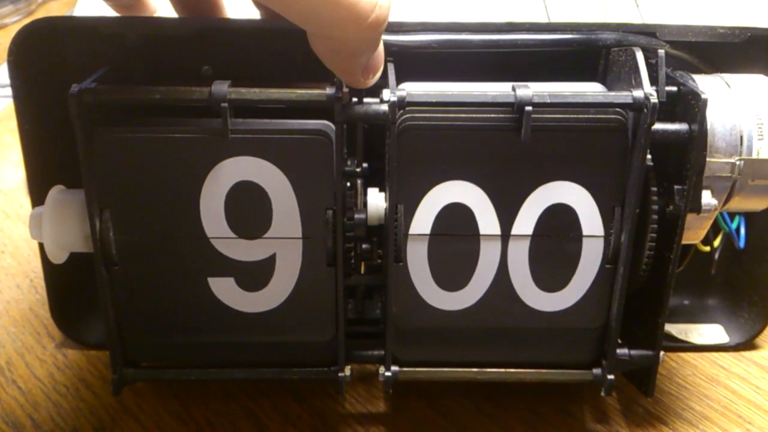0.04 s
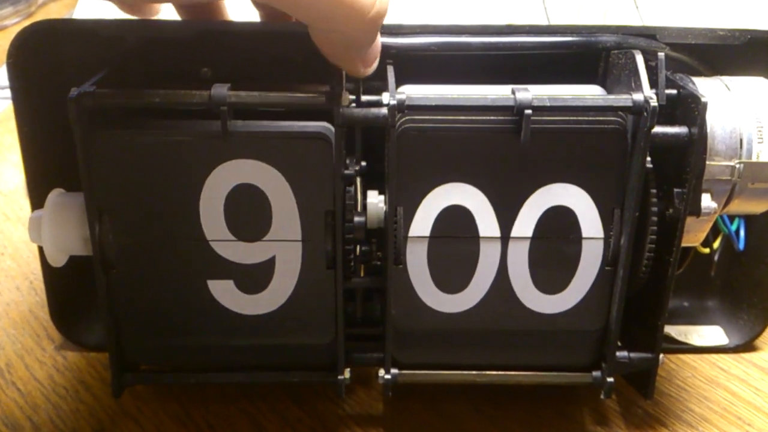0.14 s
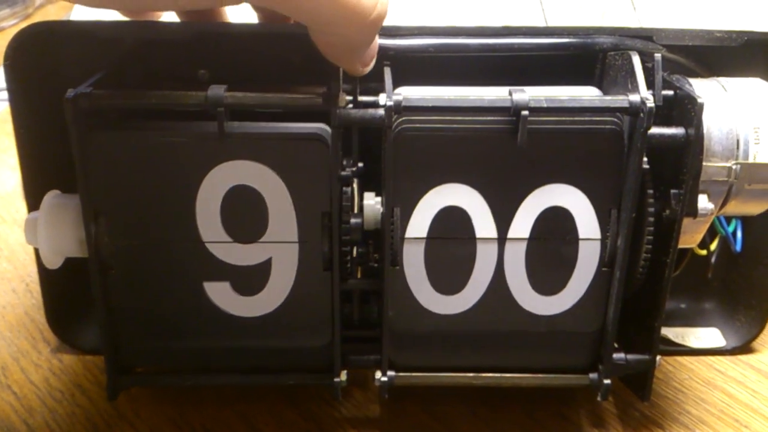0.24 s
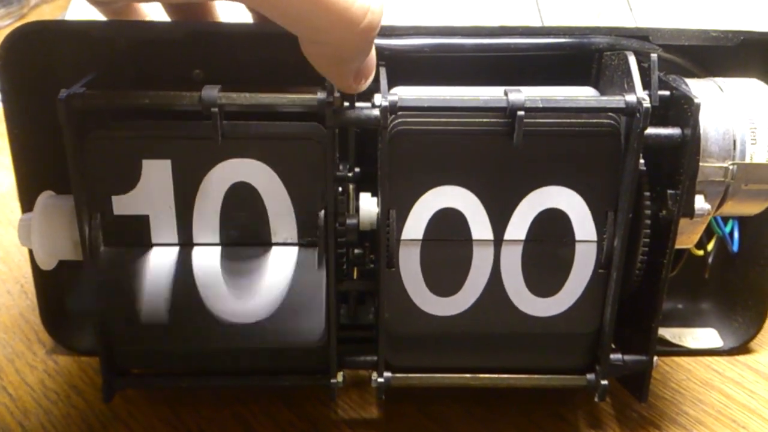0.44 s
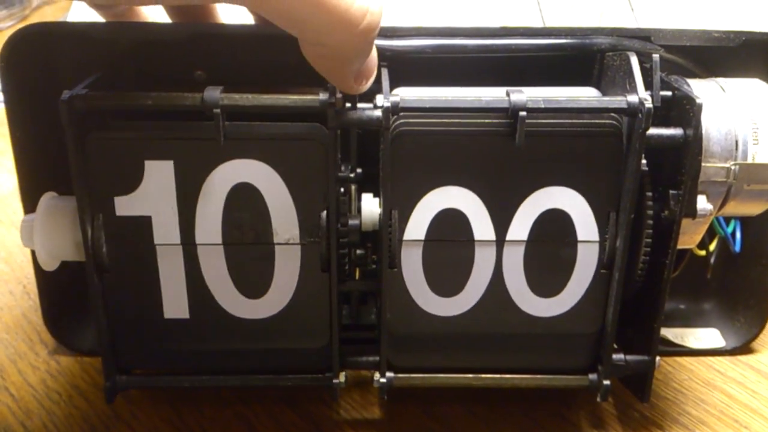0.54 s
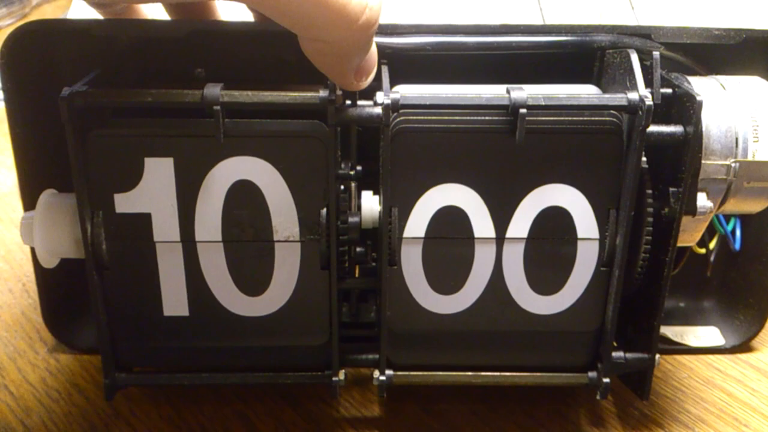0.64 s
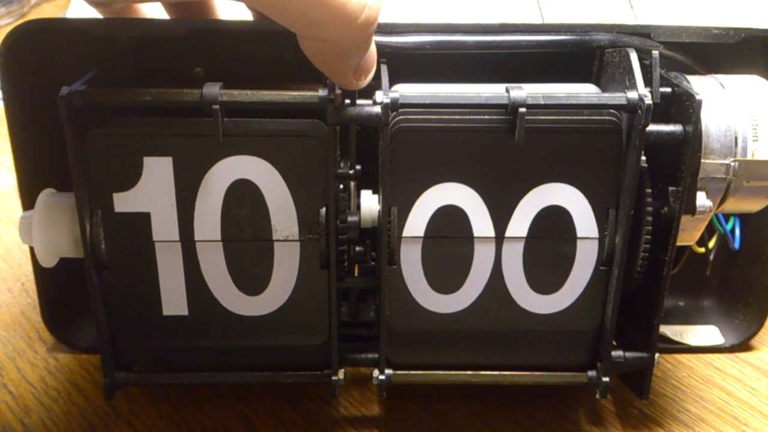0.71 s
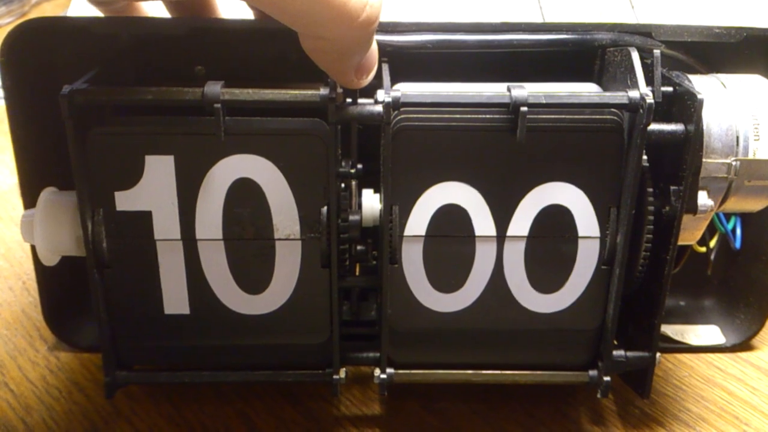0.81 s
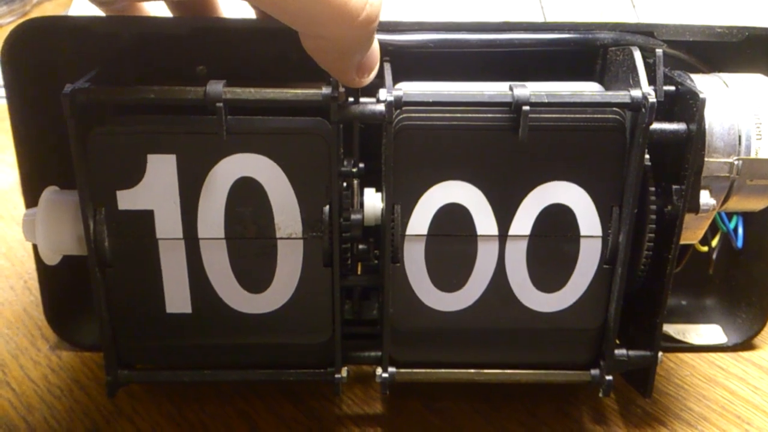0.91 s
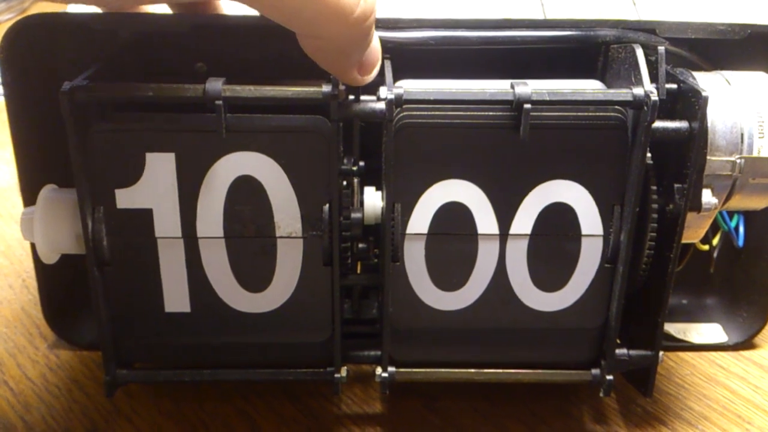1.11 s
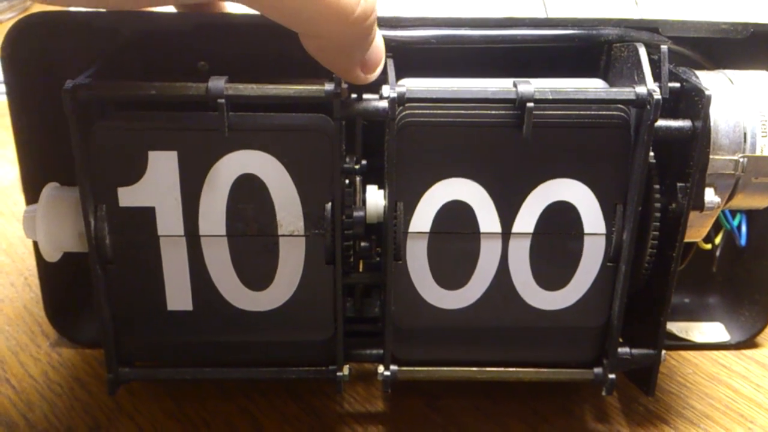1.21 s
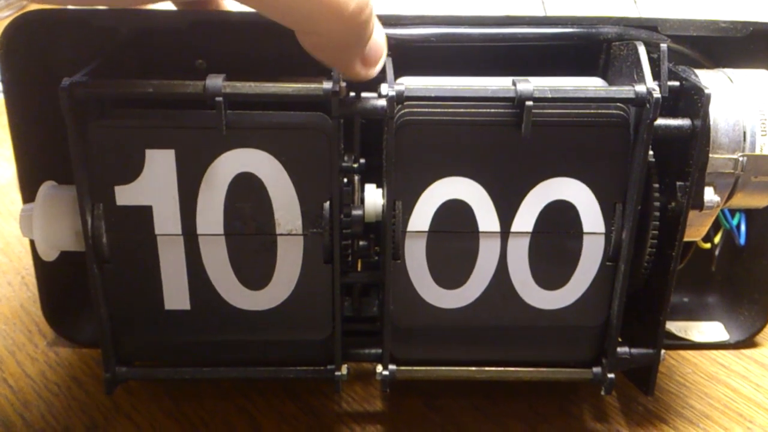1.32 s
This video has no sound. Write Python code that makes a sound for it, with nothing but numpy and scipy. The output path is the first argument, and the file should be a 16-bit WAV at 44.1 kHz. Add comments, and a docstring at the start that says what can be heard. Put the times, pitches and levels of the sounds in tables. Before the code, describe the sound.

A mechanical flip clock advances by hand with a crisp snap, flap clatter and closing click, close up

```python
"""A flip clock is turned by hand on a wooden desk, close to the microphone, over faint hum and air noise.
First a plastic pawl drags (many tiny random slips), snaps (ringing tones and a noise burst) and rebounds.
Then the hour flap slips free, slaps down and flutters: knocks of ringing tones and noise ticks.
Last, more sliding leads to a catch that clicks home, with one late flap knock.
A small room answers all the clock's sounds with a fading tail of noise."""
import sys
import numpy as np
from scipy import signal
from scipy.fft import rfft, irfft, next_fast_len
from scipy.io import wavfile
from scipy.ndimage import uniform_filter1d

SR = 44100
rng = np.random.default_rng(int(sys.argv[2]) if len(sys.argv) > 2 else 0)


def int16_out(signal):
    """Quantize to a 16-bit WAV file."""
    q = np.round(np.clip(np.atleast_2d(signal).T, -1, 1) * 32767)
    wavfile.write(sys.argv[1], SR, q.astype(np.int16))


N = 59535  # length of the scene [samples]

# In every table, t60 is the time a sound takes to fade by 60 dB.
SNAP_RISE_S = 0.0013


def amp(db):
    """Turns decibels into a gain."""
    return 10 ** (np.asarray(db) / 20)


def unit(x):
    """Scales a signal to an average (rms) level of 1."""
    return x / np.sqrt(np.mean(x ** 2) + 1e-20)


def read(points, hz):
    """Reads between the points of a table, with pitch on a log scale as we hear it."""
    table_hz, value = np.transpose(points)
    return np.interp(np.log(hz + 1), np.log(table_hz + 1), value)


def add(mix, start, sound):
    """Mixes a sound in at a start time [s], cutting off what runs past the end."""
    part = mix[round(start * SR):][:len(sound)]
    part += sound[:len(part)]


def colour(x, spectrum):
    """Makes each frequency of a signal louder or softer as a table says, then sets rms to 1."""
    size = next_fast_len(len(x))
    gain = amp(read(spectrum, np.fft.rfftfreq(size, 1 / SR)))
    return unit(irfft(rfft(x, size) * gain, size)[:len(x)])


def strike(t, rise, t60):
    """The loudness of a blow: a quick rise, then an exponential fade."""
    return (1 - np.exp(-(t / rise) ** 2)) * amp(-60 * t / t60)


def ring(modes, rise, pitch=1):
    """One blow sets off several pure tones, each fading at its own speed."""
    longest_t60 = max(t60 for _, _, t60 in modes)
    t = np.arange(0, 2 * longest_t60, 1 / SR)
    out = np.zeros(len(t))
    for k, (hz, db, t60) in enumerate(modes):
        sign = (-1) ** k  # every other tone starts downwards
        tone = np.sin(2 * np.pi * hz * pitch * t)
        out += sign * amp(db) * strike(t, rise, t60) * tone
    return out


def burst(spectrum, rise, t60, size=2048):
    """Short noise for the many crowded tones of a plastic part, which blur together."""
    noise = colour(rng.standard_normal(size), spectrum)
    return noise * strike(np.arange(size) / SR, rise, t60)


def background():
    """Ventilation is shaped noise; mains hum and fan tones are sines that waver slowly."""
    # colour of the ventilation noise: (frequency [Hz], relative level [dB])
    air = [(15, -60), (25, -43), (43, -22.5), (69, -20), (91, -7.5), (173, -5), (198, -9.5), (233, -0.5),
           (289, -7.5), (313, -11), (349, -7.5), (537, -16.5), (582, -13.5), (684, -14), (1050, -14.5),
           (2300, -23.5), (3260, -33), (9810, -38), (15500, -38.5)]
    # mains hum and fan tones: (frequency [Hz], rms level [dB])
    hum = [(100, -61), (140, -67.5), (167, -69), (237, -66.5), (349.5, -70), (435, -74), (580, -68)]
    air_db = -53.5  # rms level
    waver = 0.29  # rms wobble: share of the loudness, and radians of phase
    t = np.arange(N) / SR
    out = amp(air_db) * colour(rng.standard_normal(N), air)
    for hz, db in hum:
        # smoothing noise over 4000 samples leaves only slow drifts
        loudness_drift, phase_drift = (
            unit(uniform_filter1d(rng.standard_normal(N), size=4000, mode="wrap")) for _ in range(2))
        phase = 2 * np.pi * (hz * t + rng.random()) + waver * phase_drift
        out = out + amp(db) * unit((1 + waver * loudness_drift) * np.sin(phase))
    return out


def room(x):
    """Walls send back dense reflections: noise in which each band fades at its own speed."""
    # fading of the room: (frequency [Hz], t60 [s])
    decay = [(200, 0.9), (1500, .27), (4500, 0.26), (9000, 0.2), (15000, 0.14)]
    level_db, delay_s = -20.5, 0.0042
    hz, t, bands = signal.stft(rng.standard_normal(N // 2), SR, nperseg=256)
    fade = amp(-60 * t / read(decay, hz)[:, None])
    tail = signal.istft(bands * fade, SR, nperseg=256)[1]
    # silent for one delay, then fading in over another
    tail = tail * np.clip(np.arange(len(tail)) / SR / delay_s - 1, 0, 1)
    return amp(level_db) * signal.fftconvolve(x, tail / np.linalg.norm(tail))[:N]


def sliding():
    """Plastic drags on plastic: many tiny slips, swelling and fading with each stroke."""
    # strokes: (start [s], peak [s], end [s], peak rms level [dB], fall at both ends [dB],
    #           tilt [dB per octave])
    scrapes = [(0.141, 0.195, 0.22, -45, 14.5, -1.1), (0.345, 0.419, 0.5, -40.5, 17, -0.5),
               (0.532, 0.551, .561, -50, 4.5, -3.5)]
    # colour of the sliding, before the tilt: (frequency [Hz], relative level [dB])
    slide_colour = [(300, -14.5), (750, -1), (1200, -8.5), (1900, 3.5), (2350, 5.5), (3450, -4.5),
                    (4000, -2.5), (4900, -3.5), (6100, -13.5), (7800, -10.5), (9800, -4.5), (11500, -13),
                    (13000, -29), (16000, -40)]
    slips_per_s, spread_db = 1500, 3
    t = np.arange(N) / SR
    direction = rng.choice([-1, 1], N)
    happens = rng.random(N) < slips_per_s / SR
    strength = amp(spread_db * np.minimum(rng.exponential(1, N), 3))
    slips = direction * happens * strength
    out = np.zeros(N)
    for start, peak, end, db, fall_db, tilt_db in scrapes:
        swell = amp(np.interp(t, [start, peak, end], [db - fall_db, db, db - fall_db]))
        stroke = swell * (t > start) * (t < end)
        tilted = [(hz, level + tilt_db * np.log2(hz)) for hz, level in slide_colour]
        out = out + stroke * colour(slips, tilted)
    return out


def snap(start, levels_db, modes):
    """A sprung part slips off its tooth, hits its stop and shakes the loose flaps."""
    # colour of the crack: (frequency [Hz], relative level [dB])
    crack = [(200, -20), (700, -3), (1300, 0.5), (2000, 1), (3000, 3), (4500, 5.5), (5700, -5.5), (8000, 3),
             (11000, 5), (13000, -14), (14200, -17), (16000, -23)]
    # colour of the shaken loose flaps: (frequency [Hz], relative level [dB])
    rattle = [(300, -12), (1200, 7.5), (2300, 5.5), (3300, -3.5), (4700, 4.5), (5900, -9.5), (7800, -1),
              (9500, -4), (12300, -7), (14000, -20), (16000, -30)]
    ring_db, crack_db, rattle_db = levels_db
    out = np.zeros(N)
    add(out, start, amp(ring_db) * ring(modes, SNAP_RISE_S))
    add(out, start, amp(crack_db) * burst(crack, SNAP_RISE_S, t60=0.021))
    add(out, start, amp(rattle_db) * burst(rattle, rise=0.011, t60=0.29, size=12000))
    return out


def catch():
    """The catch clicks home: its blow rings, cracks and faintly shakes the flaps."""
    # what the catch rings with: (frequency [Hz], relative level [dB], t60 [s])
    catch_modes = [(645, -58, .05), (804, -57, 0.057), (980, -49, 0.034), (2215, -40, 0.043),
                   (2533, -34, 0.035), (3670, -40, 0.018), (4310, -27.5, 0.014), (4730, -27, .014),
                   (5725, -31.5, 0.018), (7660, -40, .015), (9100, -41, 0.02), (9620, -36.5, 0.017),
                   (10950, -32, .013), (11840, -34, 0.014)]
    # strength of the click: (ring [dB], crack [dB], rattle [dB])
    catch_levels = (4, -26, -60)
    return snap(0.5623, catch_levels, catch_modes)


def pawl():
    """The pawl snaps, sets its spring ringing and rebounds once with a hollow tock."""
    # what the pawl rings with: (frequency [Hz], relative level [dB], t60 [s])
    pawl_modes = [(1355, -38, 0.021), (1580, -22, 0.022), (1870, -22, .018), (2343, -22, 0.029),
                  (3164, -21, 0.018), (4100, -21.5, .014), (4550, -26.5, 0.015), (5140, -26, 0.02),
                  (6360, -25, .013), (7740, -19, .011), (8720, -21.5, 0.011), (9300, -14, .011),
                  (10210, -28.5, 0.011), (11000, -34, 0.0086), (12200, -24.5, 0.014), (13150, -24.5, .009)]
    # strength of the snap: (ring [dB], crack [dB], rattle [dB])
    pawl_levels = (2.5, -16.5, -40)
    # the spring that rings on: (frequency [Hz], level [dB], t60 [s])
    spring = [(3330, -56, 0.081), (4545, -53, 0.33), (4610, -53, 0.22)]
    # the hollow rebound: (frequency [Hz], level [dB], t60 [s])
    tock = [(1000, -38, 0.022), (1222, -29, 0.0326), (1410, -35, 0.023), (1600, -35, 0.014),
            (2343, -33, 0.029)]
    snap_s, rebound_s = 0.2006, 0.2178
    out = snap(snap_s, pawl_levels, pawl_modes)
    add(out, snap_s, ring(spring, SNAP_RISE_S))
    add(out, rebound_s, ring(tock, SNAP_RISE_S))
    return out


def flaps():
    """Flaps knock face on (ringing body) or edge on (noisy tick); the fall shakes the case."""
    # knocks: (time [s], body level [dB], tick level [dB], pitch factor)
    knocks = [(0.3474, -28, -55, 0.995), (0.3622, -32, -51, 0.86), (.3653, -30, -41, .98),
              (0.367, -29.5, -37, 0.94), (0.377, -45, -42, 0.78), (0.3857, -39, -43.5, 1.0),
              (0.3978, -40, -32, 1.2), (0.4016, -48, -34, 0.79), (0.4088, -28, -35.5, .98),
              (.4155, -41, -64, .9), (0.425, -58, -47, 1.0), (0.434, -47, -51, 0.91),
              (0.445, -37, -46, 1.0), (0.4483, -41, -47, 1.2), (.462, -52, -47, 1.3),
              (0.4738, -50, -47, 1.0), (0.4811, -56.5, -47.5, 1.7), (0.5781, -38, -59, 1.0)]
    # what a flap rings with at pitch factor 1: (frequency [Hz], relative level [dB], t60 [s])
    flap_modes = [(750, -20, 0.049), (1142, -15.5, 0.065), (1640, -8.5, 0.034), (1987, -7.5, 0.031),
                  (2353, -2.5, 0.024), (2533, -8.5, 0.032), (2750, -4.5, 0.016), (4000, -29, .02),
                  (4980, -24, 0.056)]
    # colour of a flap edge's tick: (frequency [Hz], relative level [dB])
    tick = [(200, -5), (1000, -8), (2300, -2), (3400, -6.5), (4500, 2), (5900, -9.5), (8200, -2.5),
            (10500, 0), (12000, -11.5), (13500, -24), (16000, -36)]
    # what the case rings with: (frequency [Hz], level [dB], t60 [s])
    case = [(95.2, -50, 0.69), (629, -39.5, 0.079), (745, -40, 0.14), (930, -35.5, 0.05),
            (1120, -43, 0.043)]
    thump_s, thump_rise_s, knock_rise_s = 0.362, 0.0049, 0.00047
    out = np.zeros(N)
    add(out, thump_s, ring(case, thump_rise_s))
    for start, body_db, tick_db, pitch in knocks:
        add(out, start, amp(body_db) * ring(flap_modes, knock_rise_s, pitch))
        add(out, start, amp(tick_db) * burst(tick, knock_rise_s, t60=0.026))
    return out


def scene():
    """The clock, the room's answer and the background, as one channel."""
    clock = pawl() + flaps() + sliding() + catch()
    return (clock + room(clock) + background())[None]


def record(dry):
    """The recorder passes only what lies below its upper band limit."""
    edge_hz = 15550
    lowpass = signal.firwin(511, edge_hz, window=("kaiser", 9), fs=SR)
    return signal.oaconvolve(dry, lowpass[None], "same")


dry = scene()
out = record(dry)
int16_out(out)
```